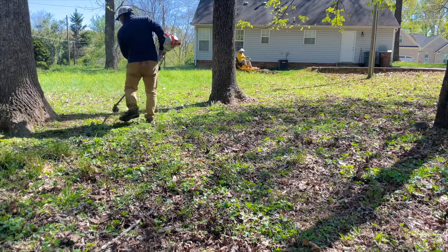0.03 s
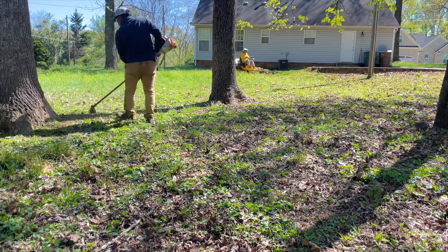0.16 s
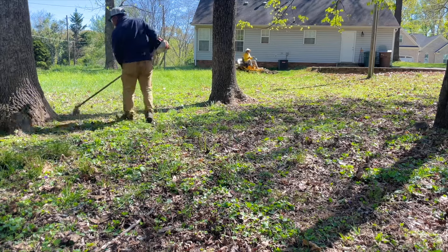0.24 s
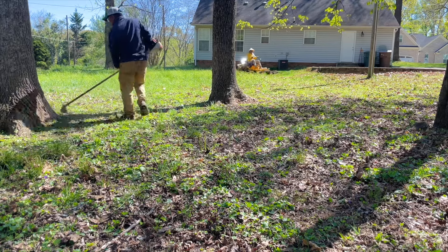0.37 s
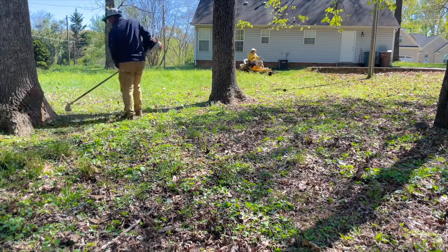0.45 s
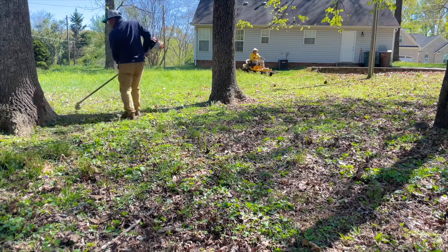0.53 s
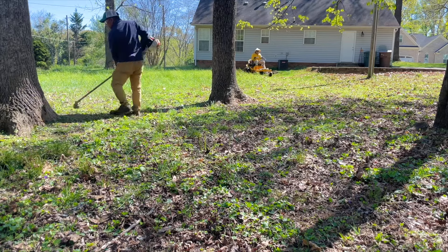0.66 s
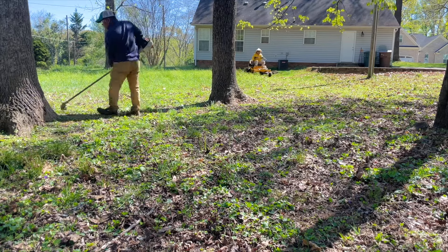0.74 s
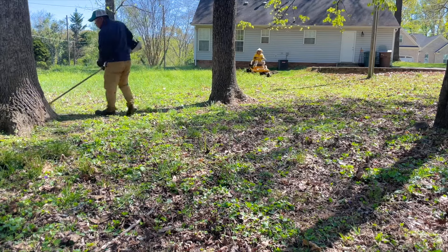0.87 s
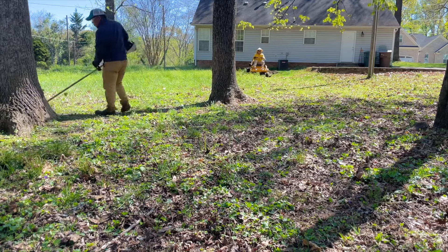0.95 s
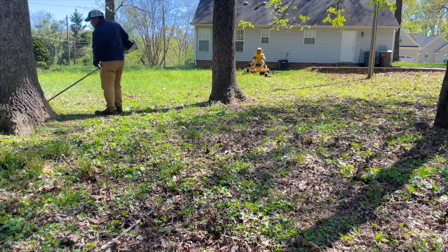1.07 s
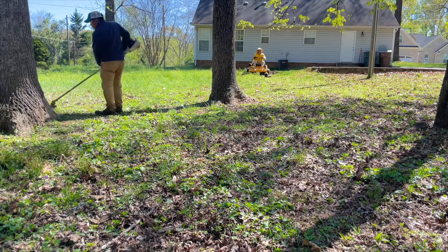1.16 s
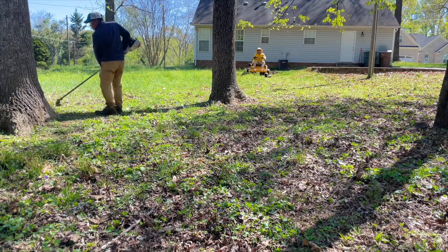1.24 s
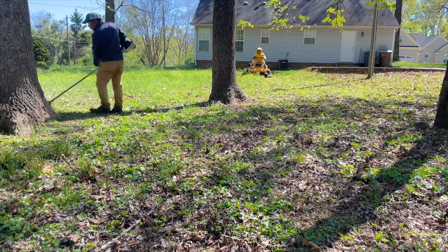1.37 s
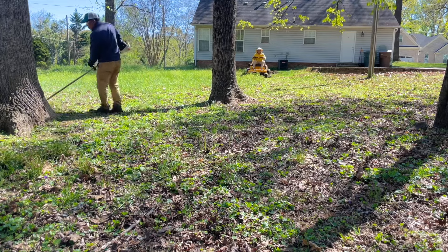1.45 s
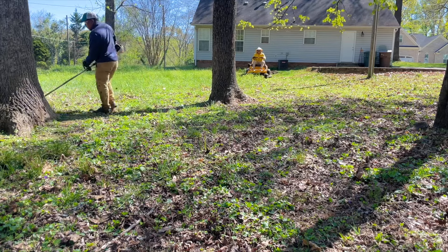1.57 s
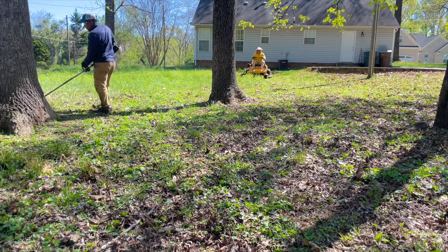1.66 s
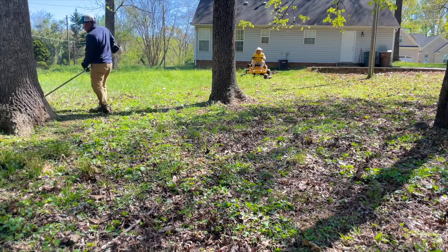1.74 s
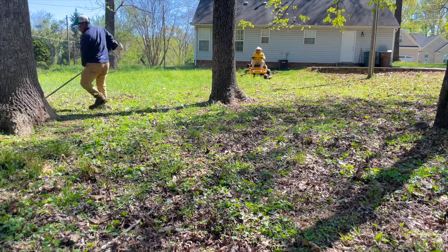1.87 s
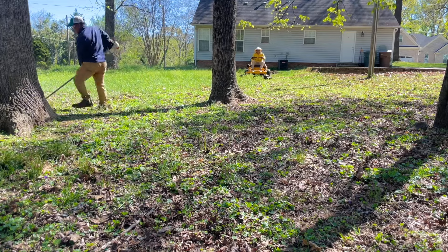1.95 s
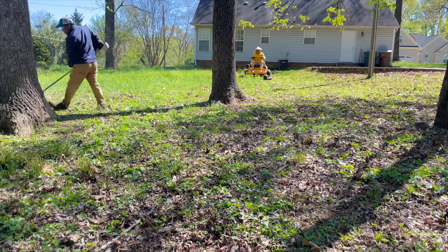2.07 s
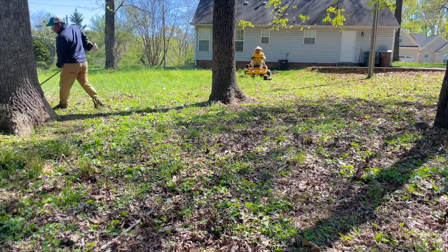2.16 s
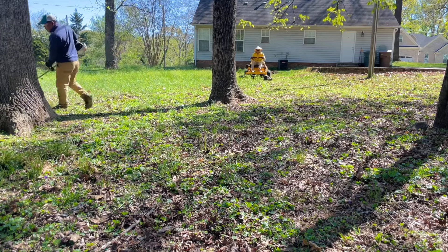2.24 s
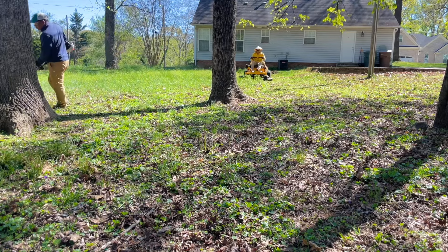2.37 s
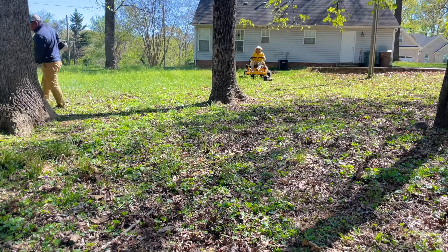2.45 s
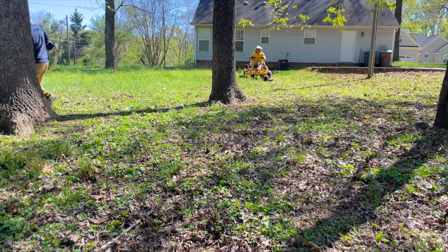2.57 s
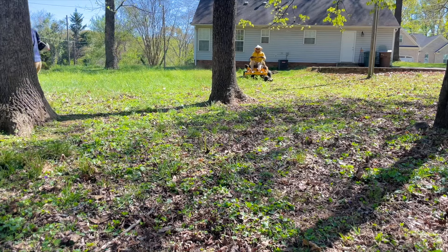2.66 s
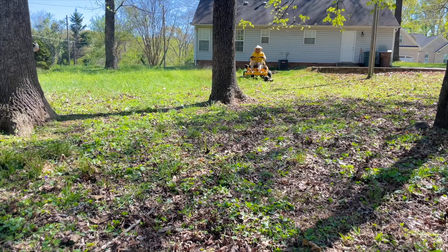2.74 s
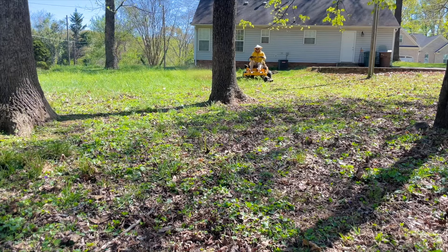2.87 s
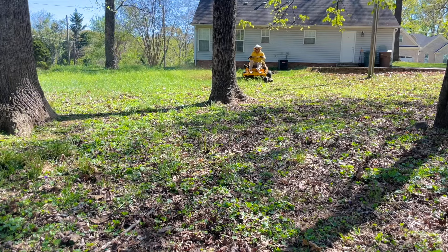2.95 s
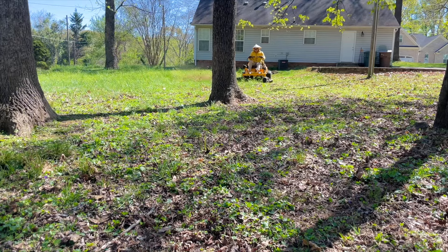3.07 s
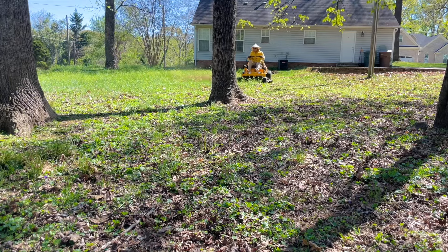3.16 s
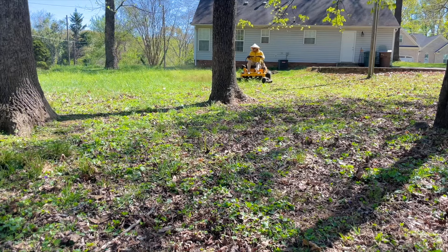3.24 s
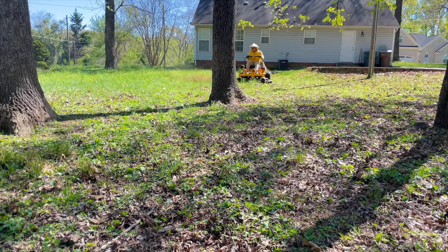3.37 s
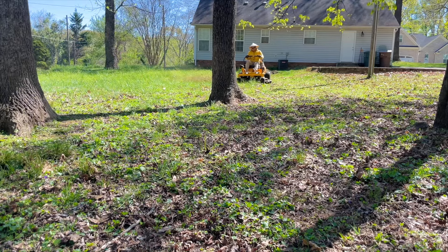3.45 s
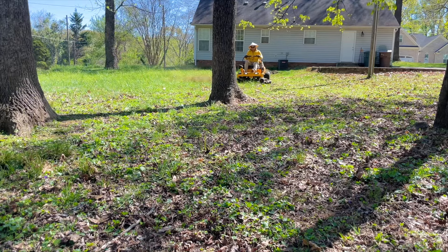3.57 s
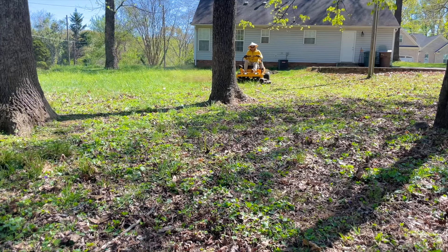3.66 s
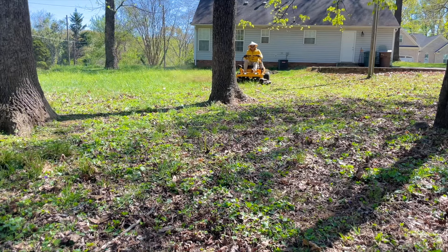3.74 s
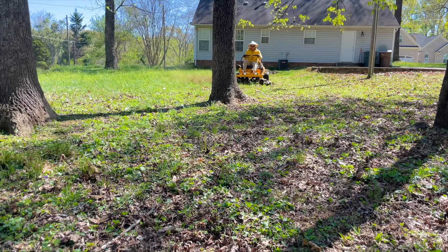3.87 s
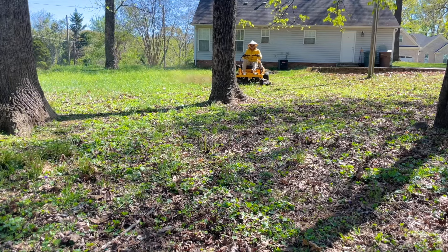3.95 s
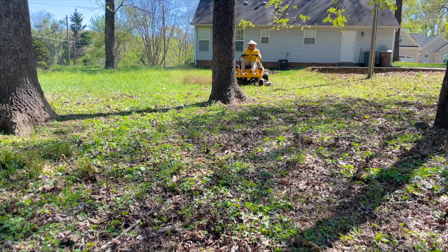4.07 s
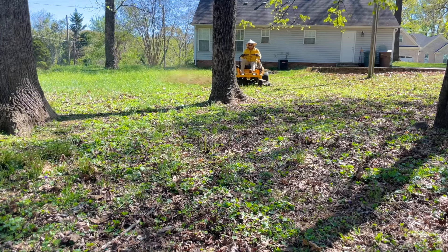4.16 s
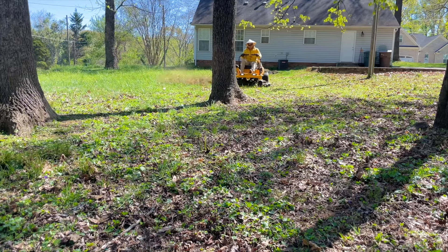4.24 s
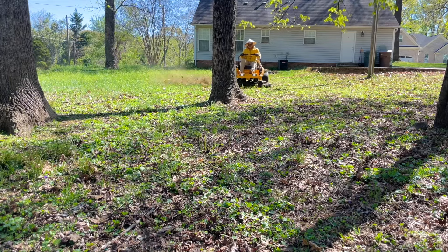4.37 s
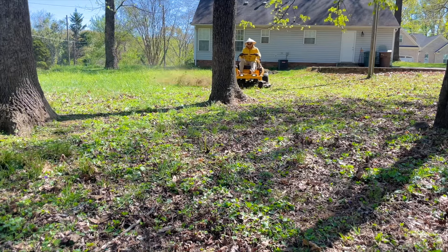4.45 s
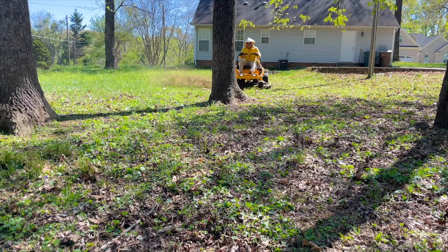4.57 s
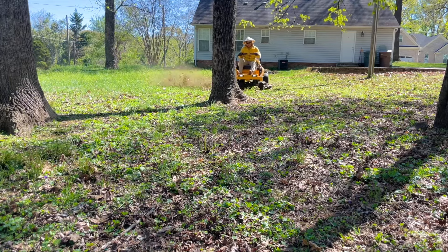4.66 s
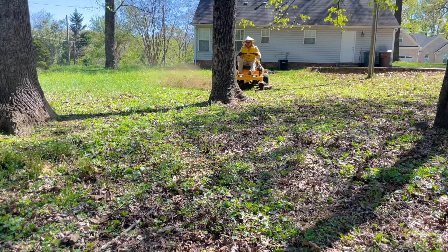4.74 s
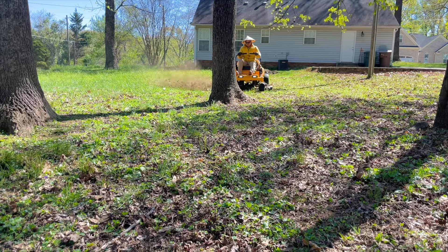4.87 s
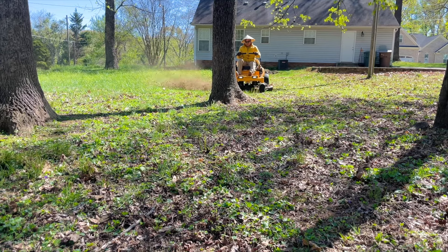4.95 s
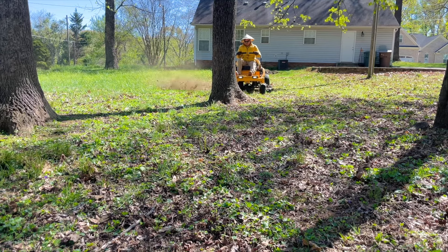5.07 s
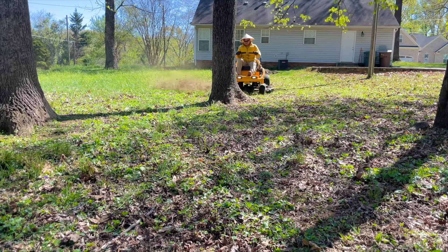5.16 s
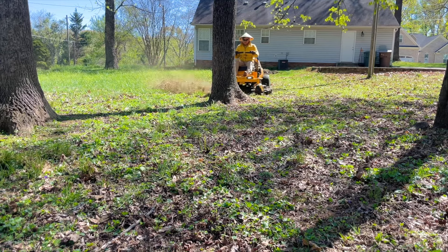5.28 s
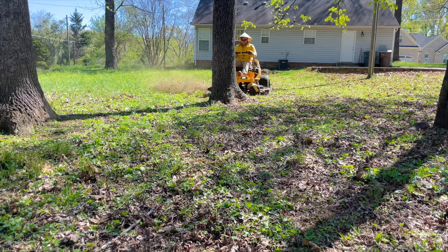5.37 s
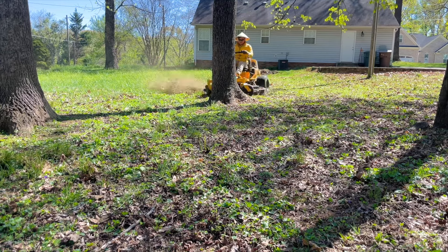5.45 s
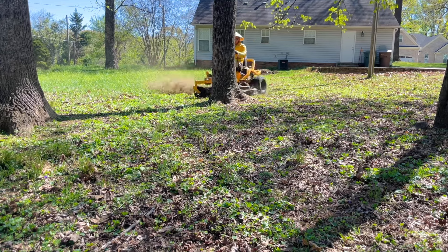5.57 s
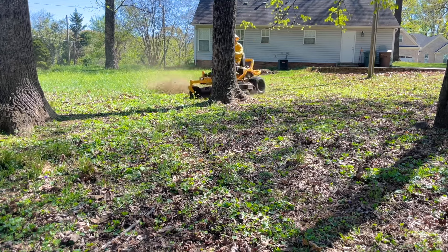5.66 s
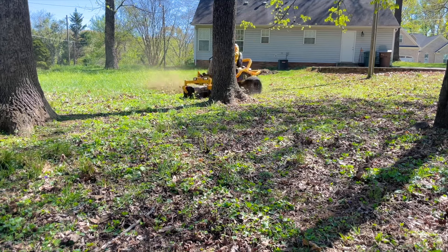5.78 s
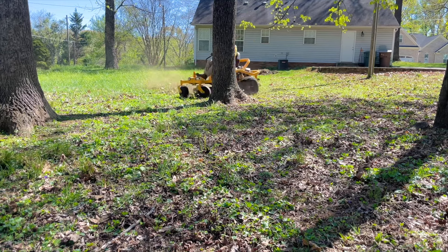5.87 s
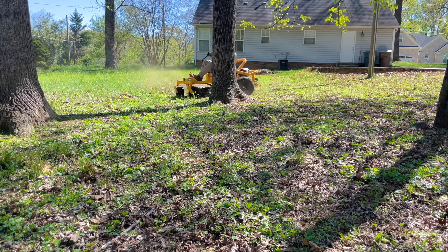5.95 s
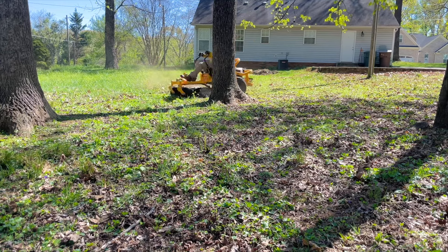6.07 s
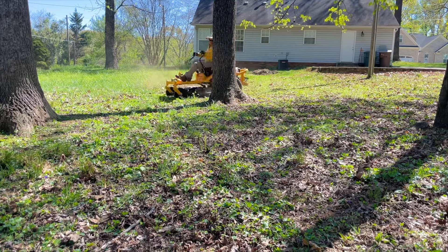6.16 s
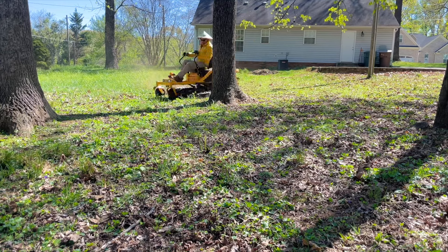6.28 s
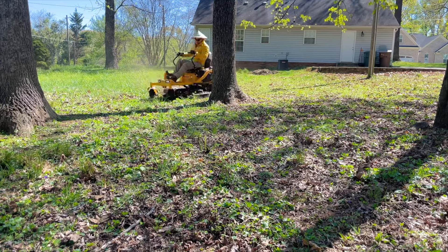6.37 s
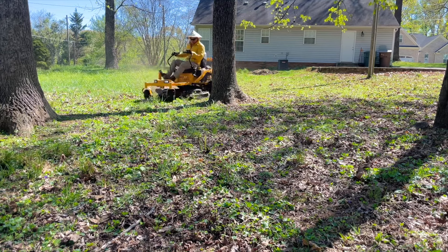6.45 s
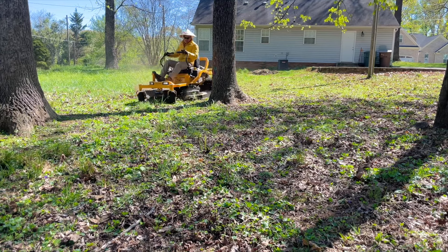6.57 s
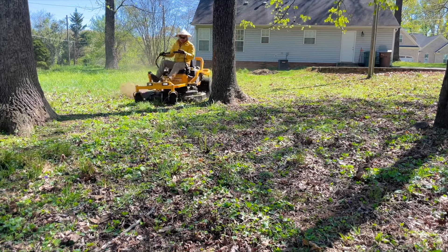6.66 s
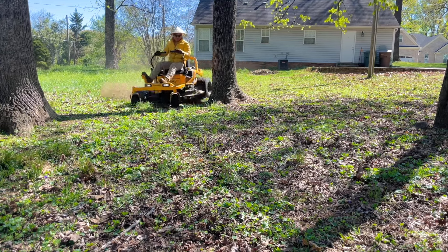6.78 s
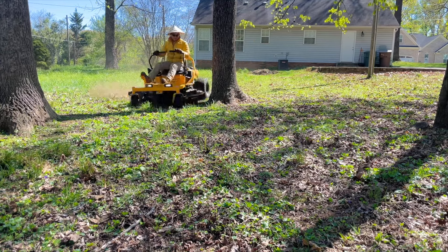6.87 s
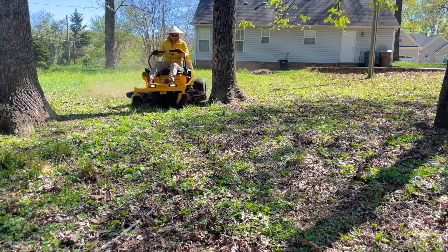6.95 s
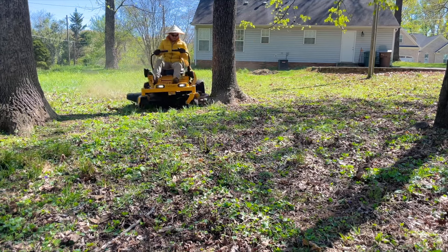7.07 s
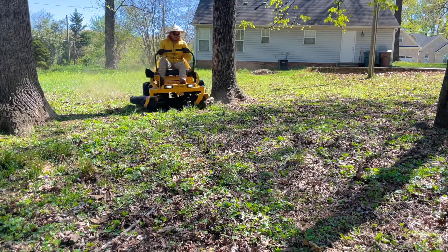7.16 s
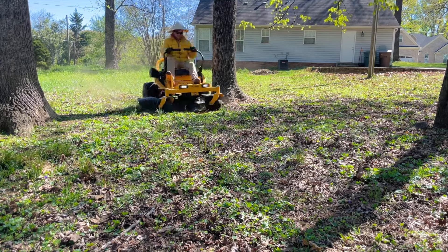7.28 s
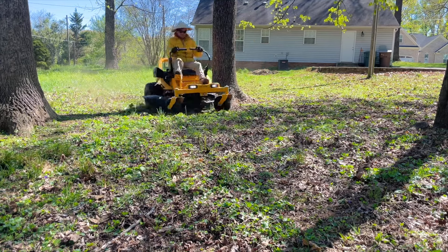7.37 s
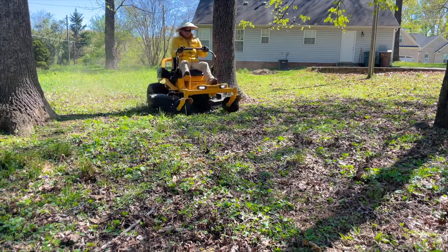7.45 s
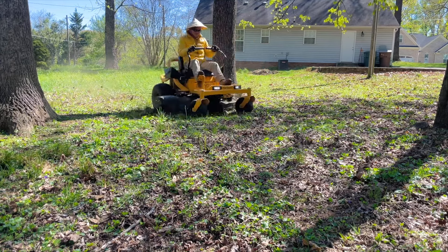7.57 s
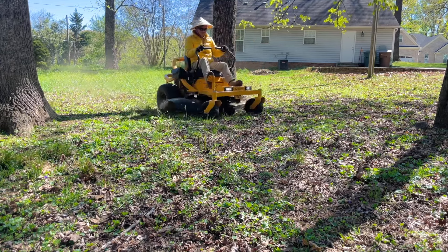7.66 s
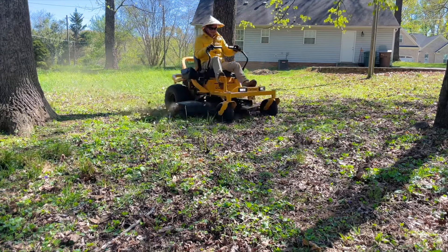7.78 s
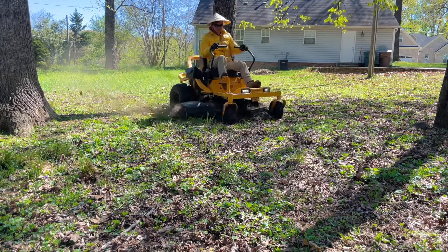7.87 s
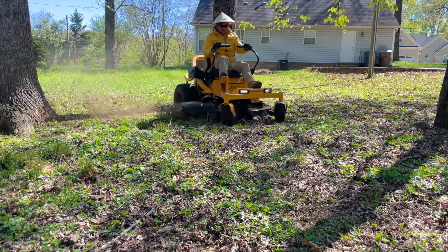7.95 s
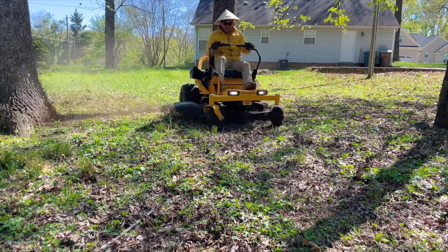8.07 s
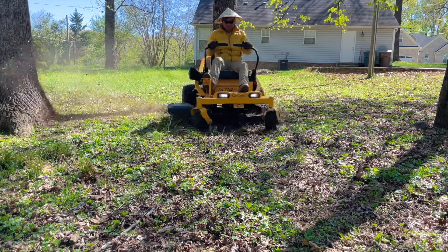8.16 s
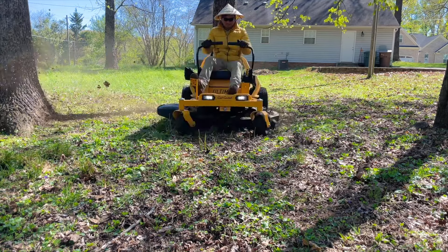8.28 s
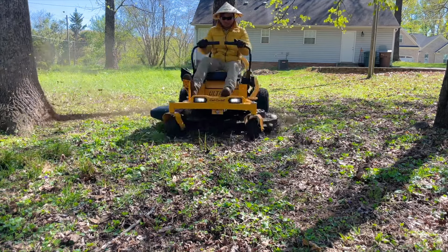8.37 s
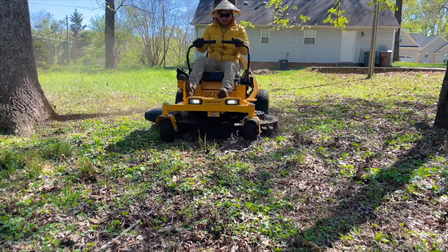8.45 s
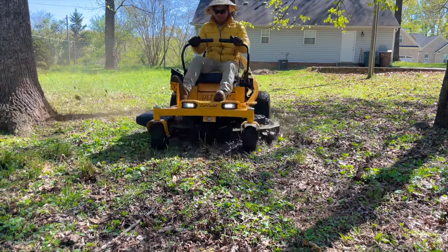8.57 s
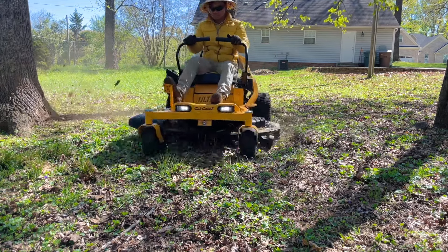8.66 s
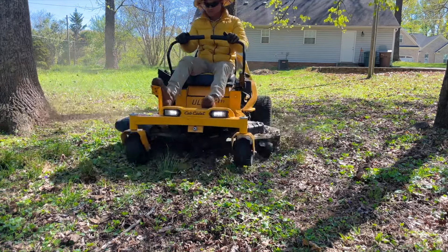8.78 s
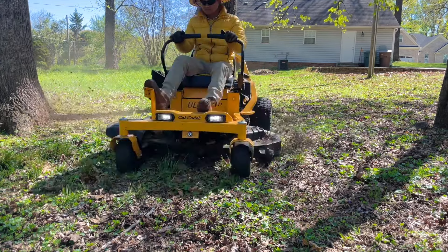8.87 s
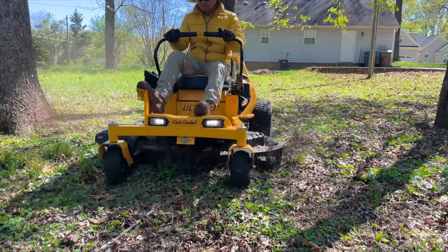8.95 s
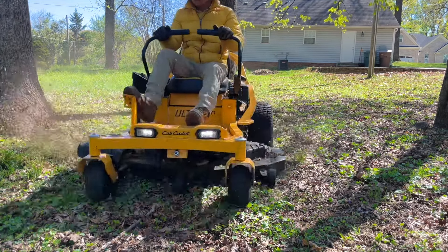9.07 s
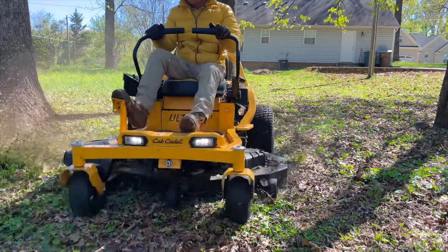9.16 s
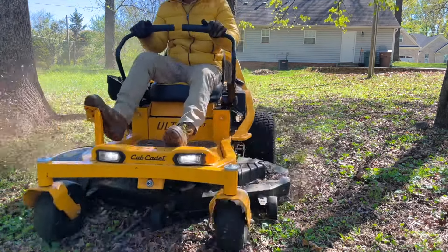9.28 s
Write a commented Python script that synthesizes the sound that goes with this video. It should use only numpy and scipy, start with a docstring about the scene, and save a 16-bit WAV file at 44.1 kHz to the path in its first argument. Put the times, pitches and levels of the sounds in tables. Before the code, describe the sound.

Outdoors, a small two-stroke tool buzzes and hisses, then fades as a mower approaches, crackling through leaves and twigs until its roar is very close.

```python
"""At first a riding mower runs some way off while a small two-stroke hand tool rasps, hisses and briefly whines nearby.
After about two seconds the motor fades and twigs begin to snap; the tool hisses on behind a tree trunk until about 5 s.
The mower comes closer over dry leaves, with steel rings, clumps, chute spray, low thuds and two high chirps.
Near the end an overtone swells as the deck swings round, and the mower is close.
Wavering sines make the engines and blades, shaped noise makes air and leaves, and fading sines make the blows."""
import sys
import numpy as np
from scipy import signal
from scipy.fft import rfft, irfft, next_fast_len
from scipy.io import wavfile
from scipy.ndimage import uniform_filter1d, map_coordinates

SR = 44100
rng = np.random.default_rng(int(sys.argv[2]) if len(sys.argv) > 2 else 0)


def dump(signal):
    """Clip the signal to [-1, 1] and save it as 16-bit WAV at the path in sys.argv[1]."""
    limited = np.clip(np.atleast_2d(signal).T, -1, 1)
    pcm = np.round(limited * 32767).astype(np.int16)
    wavfile.write(sys.argv[1], SR, pcm)


N = 411012
T = np.arange(N) / SR  # time of each sample [s]
BLADE_PASS_HZ = 125  # middle pitch of the blade overtones and rate of the roar's pulsing
PATCHY_DB = 1.5  # depth of the patches in most crackle and hiss


def amp(db):
    """Turn decibels into gain."""
    return 10 ** (np.asarray(db) / 20)


def unit(x):
    """Scale a sound to an rms of 1."""
    return x / np.sqrt(np.mean(x ** 2) + 1e-20)


def along(points, hz):
    """Read a table of (frequency [Hz], value) on a log frequency axis."""
    table_hz, values = np.transpose(points)
    return np.interp(np.log(hz + 1), np.log(table_hz + 1), values)


def curves(rows):
    """Draw one smooth-running curve over time for each column after the time."""
    times, *columns = np.transpose(rows)
    return [np.interp(T, times, column) for column in columns]


def span(rows):
    """Stay at 1 while the table runs, fading over 0.15 s outside it."""
    outside = np.minimum(T - rows[0][0], rows[-1][0] - T)
    return np.clip(1 + outside / .15, 0, 1)


def swell(start, length, rise, fall):
    """Go from 0 to 1 over the rise, hold to the end of the length, then go back over the fall [s]."""
    return np.clip(np.minimum((T - start) / rise, 1 + (start + length - T) / fall), 0, 1)


def until(end, fall):
    """Stay at 1 up to the end, then go down to 0 over the fall [s]."""
    return np.clip(1 + (end - T) / fall, 0, 1)


def wobble(rate):
    """Make a smooth random curve with this many random points a second."""
    knots = rng.standard_normal(int(N * rate / SR) + 4)
    return map_coordinates(knots, [T * rate])


def filtered(x, response):
    """Multiply a sound's spectrum by a response that depends on frequency."""
    m = next_fast_len(N + 8192)  # room for the tail
    return irfft(rfft(x, m) * response(np.fft.rfftfreq(m, 1 / SR)), m)[..., :N]


def tone(hz, unsteady):
    """Make a sine of rms 1 whose phase wavers by the unsteady curve [radians]."""
    phase = 2 * np.pi * np.cumsum(hz) / SR
    return np.sqrt(2) * np.sin(phase + rng.uniform(0, 2 * np.pi) + unsteady)


def struck(events, hz, t60, attack):
    """Make one short fading ring for each (time [s], level [dB]) blow, its pitch scattered a little."""
    out, t = np.zeros(N + SR), np.arange(SR // 2) / SR
    for (s, db), bend in zip(events, rng.normal(1, 0.0036, len(events))):
        shape = amp(db - 60 * t / t60) * (1 - np.exp(-t / attack))
        out[round(s * SR):][:len(t)] += shape * np.sin(2 * np.pi * hz * bend * t)
    return out[:N]


# How alike noise is at the two microphone ports: (frequency [Hz], likeness [0 to 1])
PORT_LIKENESS = [(100, .99), (300, .97), (450, .88), (650, .7), (1000, .8), (1800, .9), (3000, .75),
                 (5300, .55), (7000, .7), (7700, .95), (8100, .9995), (9000, .9995), (9500, .93),
                 (10500, .7), (11800, .8), (12800, .999)]


def rush(spectrum, patchy_db, flutter_db, grains=0, grain_db=5):
    """Make patchy noise of rms 1 with optional crackle; the two ports share it only in part."""
    white = rng.standard_normal((2, N))
    clicks = rng.random(N) < 900 / SR  # about 900 a second
    click_gain = amp(grain_db * np.minimum(rng.exponential(size=N), 2))
    white[0] += grains * unit(clicks * click_gain * rng.standard_normal(N))

    # Smoothed random gains over time and frequency give the patches.
    z = signal.stft(white, nperseg=256)[2]
    field = uniform_filter1d(rng.standard_normal(z.shape[1:]), 8, 0)
    field = uniform_filter1d(field, 14, 1)
    pair = signal.istft(z * amp(patchy_db * unit(field)), nperseg=256)[1][:, :N]
    pair = pair * amp(flutter_db * (wobble(28) + 0.87 * wobble(60)))

    def mix(hz):
        angle = np.arccos(np.clip(along(PORT_LIKENESS, hz), 0, 1)) / 2
        return amp(along(spectrum, hz)) * [np.cos(angle), np.sin(angle)]

    shared, own = filtered(pair, mix)
    return unit(np.array([shared + own, shared - own]))


# How far the mower is from the microphone ports: (time [s], distance [m])
MOWER_DISTANCE = [(0, 28), (1.2, 36.4), (3, 22), (4.2, 12.7), (5, 12), (6.3, 11.7), (6.9, 6.4), (7.3, 5.6),
                  (8.0, 4.76), (8.3, 3.04), (9.32, 2.65)]


def nearness_db():
    """Sound spreads out on its way, so doubling the mower's distance costs about 6 dB."""
    return -20 * np.log10(np.clip(curves(MOWER_DISTANCE)[0], 1, None))


# Mower engine: (time [s], firing rate [Hz], firing level [dB], fourth multiple's level [dB], lowered 1 dB below)
MOWER_ENGINE = [(0, 51.15, -30, -40), (1.15, 52.3, -43, -37), (1.8, 51.6, -32, -38), (2.4, 51.43, -38, -38),
                (3.1, 51.33, -26.5, -32.5), (4.0, 51.75, -38, -34), (4.4, 51.73, -30.5, -35.5),
                (5.5, 52.5, -32, -34.5), (6.1, 52.6, -27, -28.5), (6.8, 52.56, -31.5, -32.5),
                (7.2, 52.5, -34, -26), (7.6, 52.84, -27.5, -33), (8.4, 53.3, -29, -23),
                (9.32, 52, -33, -40)]
# Other engine tones: (multiple of the firing rate, level relative to the firing tone [dB])
MOWER_ORDERS = [(3, -11), (8, -15.5)]


def engine():
    """The exhaust beats at the firing rate, with a few strong tones at multiples of it."""
    hz, db, fourth_db = curves(MOWER_ENGINE)
    shake = 0.07 * wobble(14)
    out = amp(db + 1.3 * wobble(9) + 1.8 * wobble(28)) * tone(hz, 2 * shake)
    out += amp(fourth_db - 1 + 2 * wobble(8)) * tone(4 * hz, 4 * shake)
    for k, level in MOWER_ORDERS:
        out += amp(db + level + 3 * wobble(5)) * tone(k * hz, k * shake)
    return out


# Blade overtones: (multiple of the blade pass, level relative to the overall whirr [dB])
BLADE_OVERTONES = [(2, -9), (3, -3), (4, -9), (5, -11), (6, -14)]
# Two blades: (time [s], slow pass [Hz], slow level [dB], fast pass [Hz], fast level [dB])
BLADE_PASSES = [(0, 119.5, -33.5, 128, -33.5), (.8, 122.9, -38, 127.1, -37), (1.6, 120.3, -42, 127.8, -28),
                (2.0, 121.6, -35, 129.5, -34), (2.6, 121.5, -37, 129, -31), (3.3, 117.6, -34, 129.1, -26),
                (4.0, 119.5, -29, 129.6, -32), (4.6, 120, -31, 129.5, -25), (5.2, 118.5, -32, 133, -27.5),
                (6.0, 119.8, -24.5, 136.3, -26.5), (6.7, 122.3, -27.5, 137.5, -35),
                (6.95, 122.5, -18.5, 138.5, -27), (7.45, 123, -19, 139.4, -30),
                (8.0, 121, -24.5, 136.6, -46), (8.8, 122, -17.5, 137.2, -28),
                (9.32, 123.1, -21.5, 136, -46)]
# The second overtone's swell: (time [s], length [s], rise in level [dB])
DECK_TURN = (7.3, 0.45, 11)


def blades():
    """Two belt-driven blades slip to slightly different speeds, so their tones beat."""
    hz = BLADE_PASS_HZ + 1.2 * wobble(2)  # slow drift
    shake = 0.42 * wobble(20)  # grass load jerks the blades
    whirr_db = -15 + nearness_db()  # -15 dB at 1 m
    start, length, turn_db = DECK_TURN
    turning = turn_db * swell(start, length, 0.098, 0.45)  # the deck swings round
    out = np.zeros(N)
    for k, level in BLADE_OVERTONES:
        level_db = whirr_db + level + (k == 2) * turning
        out += amp(level_db + 3.5 * wobble(17) + 1.2 * wobble(3)) * tone(k * hz, k * shake)
    slow_hz, slow_db, fast_hz, fast_db = curves(BLADE_PASSES)
    for pass_hz, db in ((slow_hz, slow_db), (fast_hz, fast_db)):
        out += amp(db + 1.8 * wobble(18)) * tone(pass_hz, 0.36 * wobble(25))
    return out


# Colour of the low rumble: (frequency [Hz], level [dB per Hz])
RUMBLE_COLOUR = [(15, -24), (30, -16), (45, -10), (70, -6), (95, -2), (125, 8.5), (170, 2.5), (230, -1.5),
                 (330, -0.5), (420, -3), (520, -15.5), (700, -18), (1200, -73)]
# Colour of the roar above it: (frequency [Hz], level [dB per Hz])
ROAR_COLOUR = [(250, -6), (500, 6), (700, 1), (900, 0.5), (1100, 0.5), (1500, -3), (2200, -12),
               (4000, -18.5), (8000, -62)]


def deck_air():
    """Air churned under the deck rumbles and roars; the roar pulses at the middle blade-pass rate."""
    # Levels at 1 m; the bass carries far, so it grows less on the way in.
    rumble_db = -15.5 + 0.45 * nearness_db() + 0.16 * wobble(4)
    roar_db = -11.5 + nearness_db()
    rumble = amp(rumble_db) * rush(RUMBLE_COLOUR, patchy_db=0.5, flutter_db=0.52)
    roar = amp(roar_db) * rush(ROAR_COLOUR, patchy_db=1.0, flutter_db=.45, grains=.4)
    pulse = 1 + .17 * np.cos(2 * np.pi * BLADE_PASS_HZ * T + 2 * wobble(6))
    return rumble + roar * pulse


# Clumps of leaves going through: (time of the peak [s], crackle level [dB], spray level [dB])
LEAF_CLUMPS = [(4.83, -34, -53), (5.39, -33, -44), (5.45, -34, -47), (5.76, -34, -32)]


def clumps():
    """Each clump of leaves lifts the crackle and the spray; returns both gain curves."""
    rise = .04  # time up to the peak, and down again [s]
    crackle, spray = np.zeros(N), np.zeros(N)
    for s, crackle_db, spray_db in LEAF_CLUMPS:
        shape = swell(s - rise, rise, rise, rise)
        crackle += amp(crackle_db) * shape
        spray += amp(spray_db) * shape
    return crackle, spray


# Leaves in the blades: (time [s], level [dB])
LEAF_CHOP = [(0, -42.5), (.3, -38.5), (1.0, -42.5), (2.3, -39.5), (2.65, -40), (3.0, -36), (3.4, -35),
             (4.1, -33.5), (4.75, -35), (4.9, -32), (5.4, -32), (5.82, -30), (5.9, -33.5), (6.2, -31),
             (6.3, -29.5), (6.72, -29), (7.03, -35), (7.9, -26.5), (8.1, -29.5), (8.6, -28), (8.9, -30.5),
             (9.12, -25), (9.32, -30)]
# Colour of the chopped leaves: (frequency [Hz], level [dB per Hz])
LEAF_COLOUR = [(600, -47), (1200, -4), (1800, 3.5), (2800, 3.5), (3800, 0), (4800, -2.5), (5600, -7),
               (6500, -6.5), (8000, -5.5), (12000, -9.5), (16500, -21)]


def chopped_leaves():
    """Dry leaves break in the blades, heard as crackling noise."""
    level = amp(curves(LEAF_CHOP)[0]) + clumps()[0]
    return level * rush(LEAF_COLOUR, patchy_db=PATCHY_DB, flutter_db=1.03, grains=0.38)


# Tool motor: (time [s], half shaft speed [Hz], level [dB],
# dulling above the exhaust peak [dB per order], unevenness [radians per order])
TOOL_MOTOR = [(0, 42.4, -42, 1.5, .04), (.12, 43, -41, 1.5, .04), (.22, 41.5, -46, 1, .11),
              (.35, 39.3, -43, .8, .08), (.43, 40.3, -47, .8, .08), (.51, 42, -40, .4, .02),
              (.65, 42.5, -39.5, .2, .02), (.82, 43.4, -44, 0, .02), (.93, 42.4, -48, .3, .05),
              (1.0, 41.8, -44, 1.2, .03), (1.2, 42.4, -42, .4, .02), (1.37, 43.7, -44, -.2, .02),
              (1.45, 41, -48, .5, .07), (1.52, 39.5, -47, .6, .05), (1.75, 38.9, -48, 0, .06),
              (1.95, 39, -49, -.3, .06), (2.18, 39.8, -48, -.3, .06), (2.32, 39.2, -51, -.3, .06),
              (2.5, 39, -60, 0, .07)]
# Tool tones: (multiple of half the shaft speed, level relative to the motor [dB])
TOOL_TONES = [(8, -4), (10, -6), (13, 0), (14, 0), (16, -2), (18, -5.5), (19, -12), (20, -4), (22, -10),
              (23, -6), (24, -5)]
# Colour of the exhaust rasp: (frequency [Hz], level [dB per Hz])
BURR_COLOUR = [(450, -40), (600, -13), (750, -9), (950, -3), (1150, -11), (1400, -34)]


def tool_motor():
    """A two-stroke fires unevenly every other turn: tones at half-speed multiples, and a rasp puffed each turn."""
    hz, motor_db, dulling_db, uneven = curves(TOOL_MOTOR)
    hz = hz + .07 * wobble(9)
    shake = uneven * wobble(20)
    puffs = (1 + np.cos(4 * np.pi * np.cumsum(hz) / SR)) * rng.standard_normal(N)
    rasp = unit(filtered(puffs, lambda f: amp(along(BURR_COLOUR, f))))
    burr = amp(-45) * until(2.4, 0.48) * rasp
    motor = np.zeros(N)
    for k, level in TOOL_TONES:
        dulled_db = motor_db + level - dulling_db * max(k - 14, 0)  # the exhaust peaks at order 14
        motor += amp(dulled_db + 2 * wobble(7)) * tone(k * hz, k * shake)
    return span(TOOL_MOTOR) * motor + burr


# Colour of the tool's whine: (frequency [Hz], level [dB per Hz])
WHINE_COLOUR = [(1200, -40), (1400, -6), (1500, 5), (1650, -2), (1900, -33)]


def tool_whine():
    """A narrow band of noise gives the tool a breathy whine, fading from 0.28 s."""
    breath = filtered(rng.standard_normal(N), lambda f: amp(along(WHINE_COLOUR, f)))
    return amp(-44.5) * until(0.28, 0.34) * unit(breath)


# Tool head swung in view: (time [s], length [s], hiss level [dB], swish level [dB])
TOOL_SWEEPS = [(0.017, 0.24, -32, -37), (0.447, 0.3, -32.5, -53), (1.125, 0.19, -36.5, -56),
               (1.84, 0.069, -40, -53), (2.2, 0.071, -72, -69), (2.577, .1, -53, -59)]
# Colour of the near hiss: (frequency [Hz], level [dB per Hz])
NEAR_HISS_COLOUR = [(4500, -30), (5600, -7), (6500, -3), (7300, -1), (8100, 0), (8700, -1), (9500, -4),
                    (11500, -9), (13700, -13), (16500, -23)]
# Colour of the swish: (frequency [Hz], level [dB per Hz])
SWISH_COLOUR = [(2800, -66), (3800, -7.5), (4600, 1), (5300, 2.5), (6200, -39)]


def tool_air():
    """The tool's air hisses and swishes, louder at each sweep of its head."""
    lingers = .55  # share of the resting sound that stays when the tool eases off
    resting = (1 - lingers) * until(1.48, .08) + lingers * until(2.8, 0.28)
    hiss, swish = amp(-33) * resting, amp(-43.5) * resting
    for s, length, hiss_db, swish_db in TOOL_SWEEPS:
        hiss += amp(hiss_db) * swell(s, length, 0.092, 0.19)
        swish += amp(swish_db) * swell(s, length, 0.46, 0.28)
    out = hiss * rush(NEAR_HISS_COLOUR, patchy_db=1.5, flutter_db=0.83, grains=0.17)
    return out + swish * rush(SWISH_COLOUR, patchy_db=PATCHY_DB, flutter_db=1.0, grains=0.67)


# Grit rattling on the deck steel: (time [s], level [dB])
GRIT_RATTLE = [(2.3, -52), (2.55, -50), (3.35, -62), (5.1, -52), (6.22, -48), (6.27, -34), (6.33, -35),
               (6.38, -47), (6.43, -35), (6.47, -38), (6.52, -41), (6.57, -36), (6.62, -41), (6.7, -35),
               (6.78, -54), (7.2, -63)]


def deck_rattle():
    """Random grit hits make the deck steel ring at one note."""
    grit = (rng.random(N) < 150 / SR) * rng.standard_normal(N)  # about 150 hits a second
    # A resonance at 1810 Hz, 40 Hz wide.
    steel = unit(filtered(grit, lambda f: 1j * f * 40 / (1810 ** 2 - f * f + 1j * f * 40)))
    return span(GRIT_RATTLE) * amp(curves(GRIT_RATTLE)[0]) * steel


# Twigs struck: (time [s], crack level [dB], treble level [dB], time to fade by 60 dB [s]);
# both levels are before the burst's shape
TWIG_SNAPS = [(2.399, -32, -45, 0.046), (2.459, -32, -45, .05), (2.5625, -27, -42, 0.045),
              (2.681, -24.5, -42, 0.061), (2.966, -25, -36, 0.058), (3.12, -22, -38, 0.041),
              (3.2095, -24, -34, 0.054), (3.3394, -19, -26, 0.083), (3.548, -20, -38, 0.052),
              (3.628, -20, -36, 0.052), (3.688, -24, -38, 0.045), (3.885, -17.5, -36, 0.034),
              (3.946, -17, -35, 0.03), (3.9944, -18.5, -30, 0.063), (4.042, -19, -36, 0.046),
              (4.102, -21, -38, 0.032), (4.4299, -20.5, -22, 0.061), (4.5761, -21.5, -31, .05),
              (4.6614, -19.5, -15, .05), (4.8096, -16, -36, 0.056), (4.9722, -20.5, -33, 0.043),
              (5.201, -17, -45, 0.054), (5.3414, -16, -26, 0.086), (5.371, -14, -40, 0.063),
              (5.3813, -10.5, -19, 0.043), (5.396, -20, -34, 0.045), (5.441, -20, -38, .08),
              (5.468, -22, -38, 0.044), (5.526, -16, -23, 0.029), (5.5559, -17, -33, 0.036),
              (5.577, -24, -23, 0.025), (5.7115, -23, -28, .05), (5.741, -18, -24, .05),
              (6.025, -22.5, -44, 0.058), (6.121, -27, -43, 0.044), (6.212, -22, -36, 0.055),
              (6.261, -21, -24, 0.088), (6.4079, -24, -25, 0.048), (6.459, -21, -36, .04),
              (6.547, -16, -30, 0.038), (6.559, -16, -36, 0.046), (6.62, -18, -36, .05),
              (6.648, -20, -34, 0.045), (6.6774, -20, -38, .05), (6.705, -18.5, -36, .05),
              (6.76, -13.5, -38, 0.028), (6.83, -20, -38, 0.068), (7.508, -20.5, -36, .05),
              (7.73, -13, -18, 0.078), (7.812, -20, -32, 0.046), (7.8955, -12, -42, 0.097),
              (8.0908, -19, -27, .05), (8.5461, -18, -22, .05), (9.11, -19, -27, .06),
              (9.19, -17, -30, 0.056)]
# Colour of the cracks: (frequency [Hz], level [dB per Hz])
TWIG_COLOUR = [(700, -43), (1300, -1.5), (2000, 2.5), (3000, 4), (4200, 2), (5200, -2), (6000, -9.5),
               (8000, 1.5), (12000, -20.5), (16500, -26)]
# Clippings blown out of the chute: (time [s], level [dB])
CHUTE_SPRAY = [(4.8, -52), (5.15, -53), (6.0, -59), (6.44, -36.5), (6.9, -39.5), (7.6, -37), (7.8, -33.5),
               (9.32, -31)]
# Colour of the spray and the snaps' treble: (frequency [Hz], level [dB per Hz])
SPRAY_COLOUR = [(3500, -40), (5200, -6), (5900, -7), (6600, -3), (8600, 0), (10000, -1), (12500, -2),
                (13700, -4), (16500, -10)]


def twigs_and_spray():
    """Twigs snap in short noise bursts, and clippings spray from the chute in the noise of the snaps' treble."""
    burst, bright, t = np.zeros(N + SR), np.zeros(N + SR), np.arange(SR // 8) / SR
    first = 4.2  # lesser twigs fall at random from here on [s]
    small = [(first + u * (N / SR - first), -30 + 8 * (v - .5), -40 + 8 * (w - .5), .04)
             for u, v, w in rng.random(size=(40, 3))]
    for s, crack_db, treble_db, t60 in TWIG_SNAPS + small:
        progress = t / np.clip(t60, .02, .15)
        shape = amp(3 - 60 * progress) * (1 - np.exp(-8 * progress))
        burst[round(s * SR):][:len(t)] += amp(crack_db) * shape
        bright[round(s * SR):][:len(t)] += amp(treble_db) * shape
    snaps = burst[:N] * rush(TWIG_COLOUR, patchy_db=2, flutter_db=0, grains=.5)
    chute = span(CHUTE_SPRAY) * amp(curves(CHUTE_SPRAY)[0] + 0.37 * wobble(6.8))
    spray = chute + bright[:N] + clumps()[1]
    return snaps + spray * rush(SPRAY_COLOUR, patchy_db=PATCHY_DB, flutter_db=1.7, grains=0.55)


# Tool behind the trunk: (time [s], length [s], hiss level [dB])
TRUNK_SWEEPS = [(2.545, 0.15, -31.5), (2.772, 0.22, -23.5), (3.097, 0.35, -24), (3.566, 0.21, -23.5),
                (3.99, 0.28, -25.5), (4.29, 0.4, -23.5)]
# Colour of the hiss from behind the trunk: (frequency [Hz], level [dB per Hz])
TRUNK_HISS_COLOUR = [(3000, -30), (4500, -11), (5800, -11), (7300, -2), (8200, -4.5), (9400, 0), (10500, 0),
                     (12400, -6), (13700, -11), (16500, -17)]


def hidden_tool_air():
    """Behind the trunk the tool's hiss has another colour and swells with each sweep."""
    level = sum(amp(db) * swell(s, length, 0.25, 0.3) for s, length, db in TRUNK_SWEEPS)
    return level * rush(TRUNK_HISS_COLOUR, patchy_db=PATCHY_DB, flutter_db=1.1, grains=0.31)


# Stones on the deck steel: (time [s], level before the ring's shape and the lowering below [dB])
STONE_PINGS = [(3.3405, -30), (3.502, -28), (3.9786, -32), (4.7553, -27), (4.8291, -26), (5.0317, -29),
               (5.2014, -19), (5.3638, -26), (5.5265, -23), (5.6562, -31), (6.2624, -23), (6.3115, -27),
               (6.409, -24), (6.435, -24), (6.4889, -28), (6.565, -25)]


def deck_stones():
    """Stones strike the deck steel, which rings briefly at the same note as the grit."""
    rings = struck(STONE_PINGS, hz=1810, t60=0.14, attack=0.01)
    return rings * amp(2.5 * wobble(60) - 4.5)


# Low thuds: (time [s], level before the ring's shape [dB])
LOW_THUDS = [(5.229, -3), (5.574, -12), (5.955, -11)]


def thuds():
    """Soft low pushes, each with a weaker knock above, made of fast-fading sines."""
    low = struck(LOW_THUDS, hz=71, t60=0.12, attack=0.017)
    return low + amp(-1) * struck(LOW_THUDS, hz=128, t60=0.11, attack=0.0086)


# Short high chirps: (time [s], level before the ring's shape [dB])
HIGH_CHIRPS = [(5.681, -29), (5.7114, -26)]


def chirps():
    """Short high chirps, each a sine that fades fast."""
    return struck(HIGH_CHIRPS, hz=5030, t60=0.1, attack=.003)


def scene():
    """Add up all sources as they reach the two ports."""
    mower = engine() + blades() + deck_air() + chopped_leaves()
    tool = tool_motor() + tool_whine() + tool_air() + hidden_tool_air()
    hits = deck_rattle() + twigs_and_spray() + deck_stones() + thuds() + chirps()
    return mower + tool + hits


# Phase between the ports: (frequency [Hz], how far left leads [radians])
LEFT_LEAD = [(30, -.35), (400, -.42), (600, .4), (900, 1.5), (1300, .2), (1900, .2), (2500, .7), (3100, 1),
             (5000, .5), (5800, -1.4), (6500, -.9), (7300, -2.4), (8000, -3.13), (9000, -3.15),
             (10400, -4.3), (11500, -5), (12600, -6.283)]
# Balance between the ports: (frequency [Hz], left over right [dB])
LEFT_LOUDER = [(250, 0), (450, -3), (620, -5), (900, -1.5), (1500, 0), (3500, 1), (5000, 1), (5800, -2),
               (7000, 1), (7800, 0)]


def record(dry):
    """The two ports differ in phase and loudness by frequency, half on each side; the top is cut off."""
    def half(hz):
        return amp(along(LEFT_LOUDER, hz) / 2) * np.exp(1j * along(LEFT_LEAD, hz) / 2)

    def ports(hz):
        left = half(hz)
        right = np.where(hz > 0, 1, 0) / half(hz)
        return np.array([left, right]) * (hz < 16050)  # nothing from 16050 Hz up

    return filtered(dry, ports)


dry = scene()
out = record(dry)
dump(out)
```